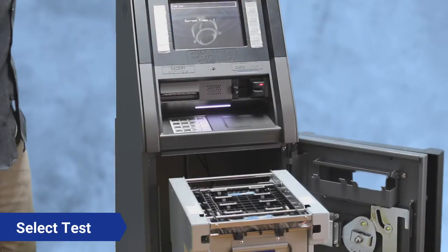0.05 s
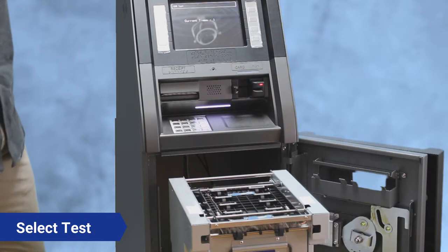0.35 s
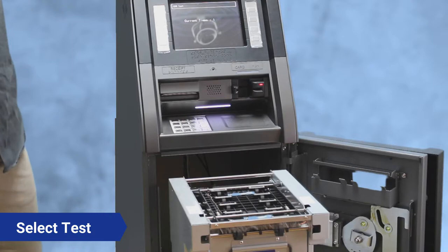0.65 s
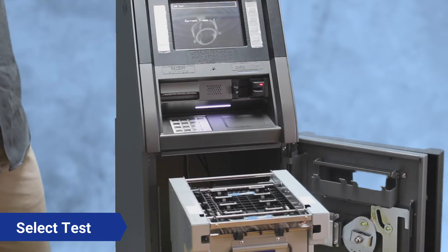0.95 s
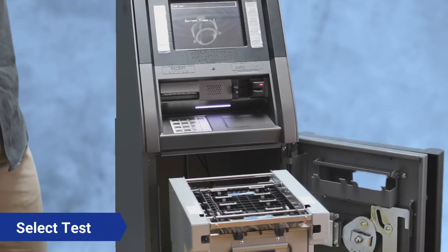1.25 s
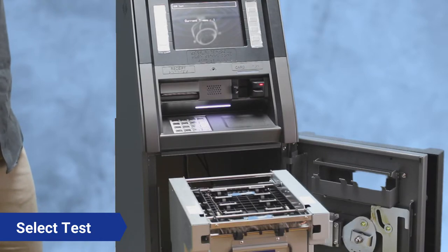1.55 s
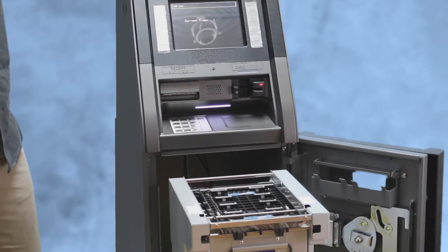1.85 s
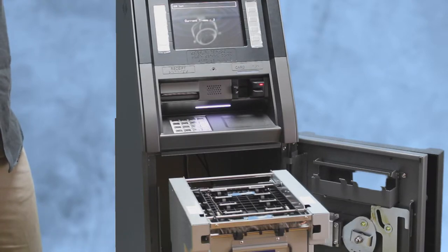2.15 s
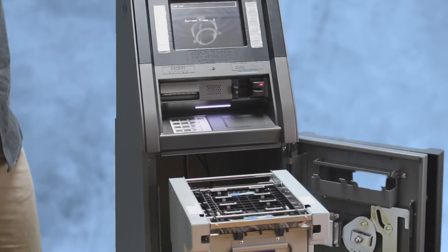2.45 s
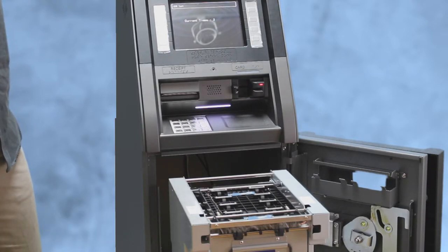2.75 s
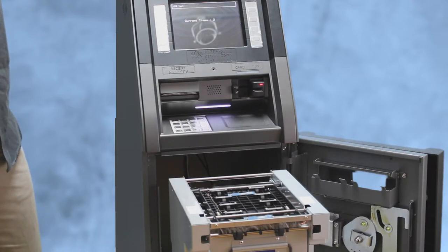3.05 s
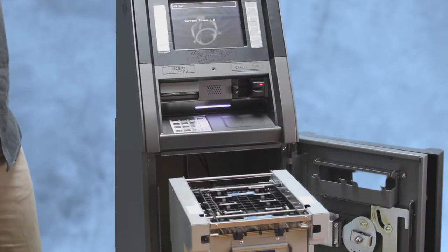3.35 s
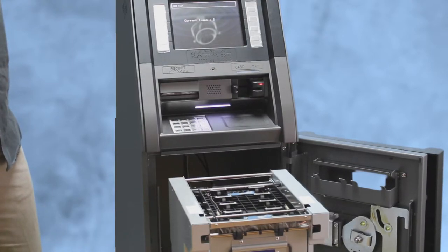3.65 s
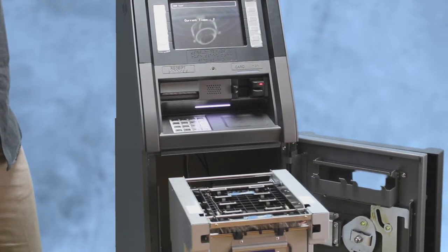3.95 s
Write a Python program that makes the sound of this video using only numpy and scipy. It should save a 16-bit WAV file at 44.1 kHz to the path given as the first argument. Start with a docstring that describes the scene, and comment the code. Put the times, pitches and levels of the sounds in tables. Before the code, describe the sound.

The motor of a cash machine hums and its gears rattle, with a run of ringing metal clacks. It brakes with a light tock and a fading hiss, leaving quiet indoor air and one soft, low bump.

```python
"""A cash dispenser whirs and rattles through a test in a quiet room.
Its motor hums while its gears and belts shake the open cabinet with many tiny impacts.
Latches clack and small springs ping along the way. The drive stops, the rollers coast with a fading
hiss, a catch drops with a small tock, and later a soft low bump sounds over the room's air."""
import sys
import numpy as np
from scipy import signal
from scipy.fft import rfft, irfft
from scipy.io import wavfile

SR = 44100
rng = np.random.default_rng(int(sys.argv[2]) if len(sys.argv) > 2 else 0)


def generate_wav(sig):
    """Save sig (samples, or channels by samples) to the path in sys.argv[1] as 16-bit PCM at SR."""
    pcm = np.round(np.clip(np.atleast_2d(sig).T, -1, 1) * 32767).astype(np.int16)
    wavfile.write(sys.argv[1], SR, pcm)


N = 176400
T = np.arange(N) / SR
FREQS = np.fft.rfftfreq(N, 1 / SR)
TONE_JITTER_HZ = 5.86  # how far a motor tone strays from its pitch
CRACK_RISE_S = 0.0023  # how long a clack takes to reach its peak

# How loud the drive runs. Each row: time in seconds, rumble and hum in relative dB, rattle in relative dB.
DRIVE_LEVELS = [(0, 1.5, -2), (.2, 0.5, 0.5), (.39, -1.5, 1.5), (.52, 0, -1.5), (.58, -5, -3.5),
                (.68, -5, 0), (.79, 0.5, -3.5), (.9, -2.5, -1), (1.0, -1.5, -3), (1.07, -4.5, -3),
                (1.2, -3.5, -5), (1.33, -6, 0.5), (1.44, -1.5, -1), (1.51, -13, -23), (1.6, -35, -34),
                (1.68, -37, -47), (1.9, -70, -75)]


def gears():
    """Gear teeth hit in quick succession, pulsing with the shafts, and shake the cabinet and frame."""
    # Regular pulses of teeth and belts. Each row: pulses per second, depth from 0 to 1.
    pulses = [(19.5, 0.06), (50.3, 0.02), (96.3, 0.07), (129, 0)]
    # The cabinet's low rumble. Each row: frequency in Hz, strength in relative dB.
    rumble_spectrum = [(30, -46), (70, -31), (110, -23), (190, -21.5), (290, -0.5), (385, -3.5), (470, 1),
                       (560, -3), (660, 2), (880, -24), (2000, -11.5), (16000, -67)]
    # The frame's brighter rattle. Each row: frequency in Hz, strength in relative dB.
    rattle_spectrum = [(100, -35), (450, -2), (700, -2.5), (880, 0), (1000, 4), (1350, 1.5), (1480, -3),
                       (1700, 0.5), (2250, -1), (2900, -5.5), (4500, -14.5), (7000, -23), (11000, -31.5),
                       (16000, -39)]
    pulse = amp(drift(width_hz=30))  # a random flutter of about 1 dB
    for rate, depth in pulses:
        pulse *= 1 + depth * np.cos(2 * np.pi * (rate * T + rng.random()))
    teeth = grains(per_s=1800, spread_db=2.5) + rng.standard_normal(N)
    rumble = colour(pulse * rng.standard_normal(N), rumble_spectrum)
    rattle = colour(pulse * teeth, rattle_spectrum)
    return (amp(-22.5) * level(DRIVE_LEVELS, column=1) * rumble
            + amp(-22) * level(DRIVE_LEVELS, column=2) * rattle)


def motor():
    """Wavering tones follow one shaft's speed, and a low hum holds briefly while the motor brakes."""
    # Tones of the running motor and gears. Each row: pitch in Hz, level in dB at a drive level of 0 dB.
    running_tones = [(224, -36.5), (238, -42), (284, -37), (305, -38), (339, -31), (422, -33), (455, -32),
                     (482, -38), (508, -34), (581, -34), (631, -38.5), (665, -43.5), (781, -40.5),
                     (962, -35.5), (1014, -42.5), (1058, -57), (1249, -35), (1320, -39), (1372, -35.5),
                     (1739, -50), (2073, -35.5), (2290, -40)]
    # The hum while braking. Each row: pitch in Hz, level in dB.
    braking_tones = [(169, -38.5), (224, -44.5), (283, -35), (335, -39.5)]
    speed = 1 + 0.00248 * drift(width_hz=13.2)

    def tone(hz):
        """One tone whose pitch and loudness wander a little."""
        cycles = np.cumsum(hz * speed + TONE_JITTER_HZ * drift(width_hz=52.5)) / SR
        waver_db = 3 * drift(width_hz=6.5)
        return unit(amp(waver_db) * np.sin(2 * np.pi * (cycles + rng.random())))

    brake_from_s, brake_to_s, fade_s = 1.45, 1.61, 0.012
    brake_on = np.clip(np.minimum(T - brake_from_s, brake_to_s - T) / fade_s, 0, 1)
    running = sum(amp(db) * tone(hz) for hz, db in running_tones)
    braking = sum(amp(db) * tone(hz) for hz, db in braking_tones)
    return level(DRIVE_LEVELS, column=1) * running + brake_on * braking


def latches():
    """Each blow is a short clatter of metal parts that rings the latch and two panels."""
    # Latch blows. Each row: start in seconds, crack level in dB, decay in seconds, body boost in dB,
    # treble boost in dB, low panel's ring in dB, high panel's ring in dB.
    clacks = [(.392, -16, 0.0096, 2.5, -8, -40, -42), (0.4717, -16, 0.0088, 6.5, 4.5, -29, -22.5),
              (0.522, -24, 0.011, 4, -2, -25, -45), (0.6466, -16.5, 0.0065, 3, -1, -37, -48),
              (0.7364, -15, 0.011, 2.5, 1, -30, -47), (0.778, -24, .005, -6, -2, -38, -43),
              (.823, -22.5, 0.0098, -7, -7, -40, -45), (0.949, -13.5, 0.0067, -9, -5, -17, -35),
              (0.9848, -16.5, 0.013, -1, -3, -18.5, -31.5), (1.02, -25, 0.0082, -7, 1, -39, -43),
              (1.1122, -20, 0.0078, 10, 7, -20, -18.5), (1.134, -29, 0.0053, 1, 4, -27.5, -39)]
    # The clatter of metal. Each row: frequency in Hz, strength in relative dB.
    clatter_spectrum = [(80, -21), (250, -1.5), (700, 1.5), (1200, -7.5), (2100, 4), (3200, 1), (5500, -2),
                        (8000, -6.5), (10500, -9.5), (13000, -15.5), (16000, -21)]
    # The notes a latch rings at. Each row: pitch in Hz, level in relative dB.
    latch_notes = [(2450, -0.5), (3600, -1.5), (4900, -8), (6900, -26), (8000, -14), (10400, -13)]
    # The low and the high panel. Each row: pitch in Hz, seconds to fade by 60 dB.
    panels = [(286, 0.26), (797, 0.28)]
    clatter = colour(grains(per_s=14000, spread_db=-0.5), clatter_spectrum)
    body = keep_below(clatter, hz=2980)
    treble = clatter - keep_below(clatter, hz=7500)
    out = np.zeros(N)
    for start, db, decay, body_db, treble_db, *panel_dbs in clacks:
        crack = clatter + (amp(body_db) - 1) * body + (amp(treble_db) - 1) * treble
        out += amp(db) * blow(start, CRACK_RISE_S, decay) * crack
        for hz, note_db in latch_notes:
            pitch = hz * (1 + 0.031 * rng.standard_normal())  # no two blows ring quite alike
            out += amp(db + note_db - 6.5) * ring(start, CRACK_RISE_S, pitch, fade_s=0.065)
        for (hz, fade_s), panel_db in zip(panels, panel_dbs):
            out += amp(panel_db) * ring(start, rise_s=0.0048, hz=hz, fade_s=fade_s)
    return out


def snap():
    """The hardest latch blow opens with a stiff part snapping home."""
    burst = blow(start_s=0.9502, rise_s=CRACK_RISE_S, decay_s=0.0028)
    return amp(-14.5) * burst * band(hz=3880, width_hz=1700)


def springs():
    """Small springs tick and ping, very high, between the blows."""
    # Spring pings. Each row: start in seconds, level in dB, pitch in Hz.
    pings = [(.419, -40, 12100), (.5926, -39, 12100), (.676, -44, 12080), (.766, -39, 12500),
             (.8131, -41, 12100)]
    tick_noise = amp(1) * band(hz=10500, width_hz=5000)
    out = np.zeros(N)
    for start, db, hz in pings:
        ping = blow(start, rise_s=0.002, decay_s=0.012) * band(hz, width_hz=600)
        tick = blow(start, rise_s=0.001, decay_s=0.003) * tick_noise
        out += amp(db) * (ping + tick)
    return out


def motor_bass():
    """The motor's lowest tone and a low drone swell and ease together."""
    # The swell of the bass. Each row: time in seconds, level in relative dB.
    swell = [(0, -36), (.2, -35.5), (.37, -32.5), (.44, -32.5), (.54, -31), (.63, -34), (.73, -29),
             (.83, -31.5), (.88, -34.5), (1.08, -46), (1.3, -37.5), (1.46, -41), (1.62, -46), (1.75, -72)]
    # The low drone. Each row: frequency in Hz, strength in relative dB.
    drone_spectrum = [(25, -38), (65, -23), (98, -3.5), (140, -0.5), (168, 3), (190, -3.5), (300, -21),
                      (2000, -70)]
    drone = amp(-5.5) * colour(rng.standard_normal(N), drone_spectrum)
    pitch_hz = 168.1 + TONE_JITTER_HZ * drift(width_hz=47)
    tone = amp(-5) * unit(np.sin(2 * np.pi * np.cumsum(pitch_hz) / SR))
    return level(swell) * (drone + tone)


def rollers():
    """Spinning rollers hiss with a faint ring and belts sizzle; both fade after the drive stops."""
    # How loud the rollers are. Each row: time in seconds, level in dB.
    hiss_levels = [(0, -43), (1.2, -32), (1.45, -36), (1.62, -36.5), (1.79, -39), (1.87, -42.5),
                   (1.96, -45.5), (2.07, -46), (2.2, -50.5), (2.5, -55.5), (2.9, -80)]
    # The rollers' hiss. Each row: frequency in Hz, strength in relative dB.
    hiss_spectrum = [(100, -4), (200, 3.5), (430, 6), (650, 0), (1200, -3.5), (1900, -6), (2650, -3),
                     (3500, -13), (4400, -7.5), (5100, -12), (6100, -9.5), (7700, -20.5), (10000, -16),
                     (16000, -40)]
    # How loud the belts are. Each row: time in seconds, level in dB.
    sizzle_levels = [(0, -42), (.4, -68), (1.2, -66), (1.45, -46.5), (1.7, -47), (1.82, -53), (1.95, -61),
                     (2.3, -85)]
    # The belts' thin sizzle. Each row: frequency in Hz, strength in relative dB.
    sizzle_spectrum = [(6000, -35), (11500, -7), (12600, -5), (13700, 0), (14700, -12), (16000, -8)]
    hiss = colour(grains(per_s=9000, spread_db=-1), hiss_spectrum)
    faint_ring = amp(-15) * band(hz=2536, width_hz=250)
    sizzle = colour(rng.standard_normal(N), sizzle_spectrum)
    return level(hiss_levels) * (hiss + faint_ring) + level(sizzle_levels) * sizzle


def catch():
    """A catch drops with a small dry tock once the drive has stopped."""
    # The notes of the tock. Each row: pitch in Hz, level in dB, seconds to fade by 60 dB.
    notes = [(784, -24.5, 0.031), (890, -27.5, 0.036), (1110, -31, 0.022)]
    return sum(amp(db) * ring(start_s=1.6403, rise_s=0.0013, hz=hz, fade_s=fade_s)
               for hz, db, fade_s in notes)


def bump():
    """A soft, dull bump sounds somewhere in the room."""
    # The bump's low bands of noise. Each row: centre in Hz, level in dB.
    low_bands = [(200, -41.5), (255, -45), (365, -46), (480, -53)]
    thud = sum(amp(db) * band(hz, width_hz=47) for hz, db in low_bands)
    return blow(start_s=2.632, rise_s=0.046, decay_s=0.082) * thud


def room_echo(x):
    """The room answers a sound with a short, smooth echo whose highest treble dies first."""
    # How long the echo lasts. Each row: frequency in Hz, seconds to fade by 60 dB.
    fade_times = [(100, .35), (1000, 0.22), (5000, 0.39), (15000, 0.11)]
    hz, t, noise = signal.stft(rng.standard_normal(SR // 2), SR, nperseg=256)
    fade = amp(-60 * t / look_up(fade_times, hz)[:, None])
    tail = signal.istft(noise * fade, SR, nperseg=256)[1]
    tail *= np.minimum(T[:len(tail)] / 0.0045, 1)  # the echo builds up over 4.5 ms
    return signal.fftconvolve(x, tail / np.linalg.norm(tail))[:N]


def air():
    """The room's air murmurs almost steadily, and a faint rush rises near the end."""
    # How loud the air is. Each row: time in seconds, level in dB.
    air_levels = [(0, -48), (2.4, -45), (3.1, -45), (3.95, -44.5)]
    # The air's deep murmur. Each row: frequency in Hz, strength in relative dB.
    air_spectrum = [(12, -31), (20, -10.5), (44, -4), (76, -13), (106, 1), (148, -2), (180, -3.5),
                    (393, -10), (649, -12.5), (881, -15.5), (1200, -16), (1580, -18), (6360, -24.5),
                    (15500, -32)]
    # How loud the late rush is. Each row: time in seconds, level in dB.
    rush_levels = [(3.1, -82), (3.35, -61), (3.65, -54), (3.95, -57)]
    murmur = level(air_levels) * colour(rng.standard_normal(N), air_spectrum)
    return murmur + level(rush_levels) * band(hz=850, width_hz=1300)


def amp(db):
    """Turns decibels into a number to multiply by."""
    return 10 ** (np.asarray(db) / 20)


def unit(x):
    """Scales a signal to an average strength (rms) of 1."""
    return x / np.sqrt(np.mean(x ** 2) + 1e-20)


def level(rows, column=1):
    """Turns rows of times and dB levels into a volume curve."""
    rows = np.array(rows)
    return amp(np.interp(T, rows[:, 0], rows[:, column]))


def look_up(rows, hz):
    """Finds a table's value at any frequency, blending between rows by musical distance."""
    row_hz, values = np.transpose(rows)
    return np.interp(np.log(hz + 1), np.log(row_hz + 1), values)


def colour(x, spectrum):
    """Shapes the lows and highs of a sound, then scales it to strength 1."""
    return unit(irfft(rfft(x) * amp(look_up(spectrum, FREQS)), N))


def keep_below(x, hz):
    """Keeps the part of a sound that lies below a frequency."""
    return irfft(rfft(x) / (1 + (FREQS / hz) ** 8), N)


def band(hz, width_hz):
    """Noise gathered around one frequency."""
    return unit(irfft(rfft(rng.standard_normal(N)) / (1 + (2 * (FREQS - hz) / width_hz) ** 4), N))


def drift(width_hz):
    """A random wander around zero; wider means quicker."""
    return band(0, width_hz)


def grains(per_s, spread_db):
    """Tiny impacts of uneven size at random moments."""
    hits = rng.random(N) < per_s / SR
    signs = rng.choice([-1., 1.], N)
    sizes = amp(spread_db * np.minimum(rng.exponential(1, N), 4))
    return unit(hits * signs * sizes)


def blow(start_s, rise_s, decay_s):
    """The volume curve of a hit: a straight rise, then a fall to about a third every decay_s."""
    t = np.maximum(T - start_s, 0)
    return np.minimum(t / rise_s, 1) * np.exp(-np.maximum(t - rise_s, 0) / decay_s)


def ring(start_s, rise_s, hz, fade_s):
    """One note of a struck part, dropping by 60 dB in fade_s."""
    return blow(start_s, rise_s, fade_s / np.log(1000)) * np.sin(2 * np.pi * hz * (T - start_s))


def scene():
    """The machine, the echo of its sharp hits, the bump and the room's air, in one channel."""
    hits = latches() + snap() + springs()
    drive = gears() + motor() + motor_bass() + rollers()
    echo = amp(-3.5) * room_echo(hits)
    return (drive + hits + echo + catch() + bump() + air())[None]


def record(dry):
    """Cuts away the very highest treble, above 15800 Hz."""
    treble_cut = signal.firwin(801, 15800, window=("kaiser", 9), fs=SR)
    return signal.oaconvolve(dry, treble_cut[None], "same")


dry = scene()
out = record(dry)
generate_wav(out)
```